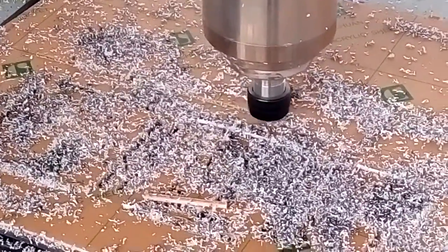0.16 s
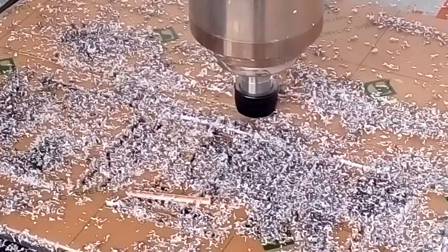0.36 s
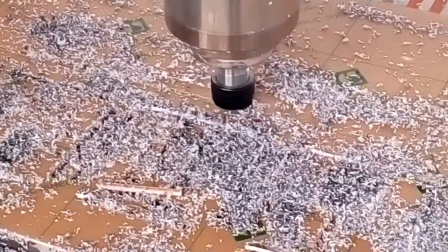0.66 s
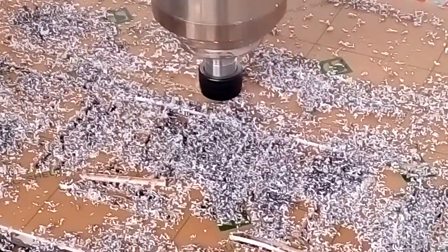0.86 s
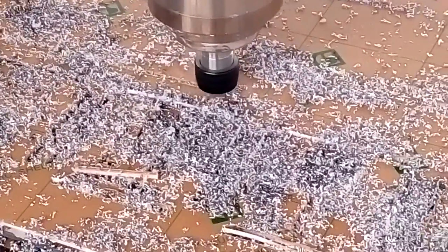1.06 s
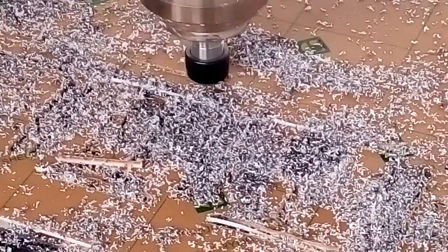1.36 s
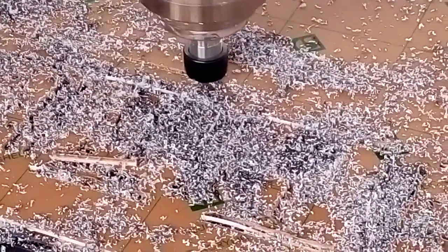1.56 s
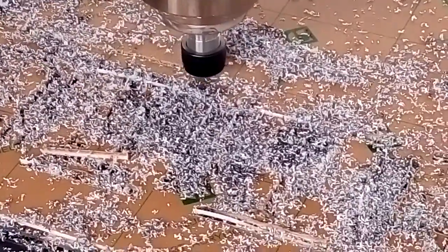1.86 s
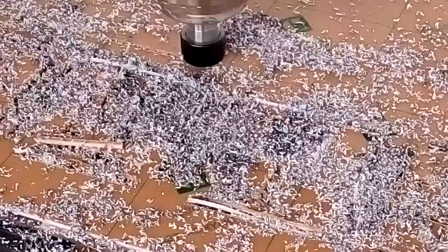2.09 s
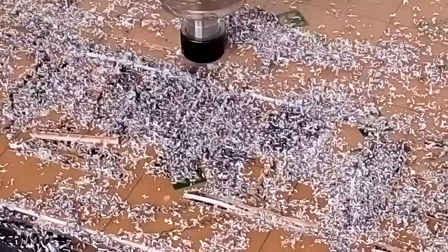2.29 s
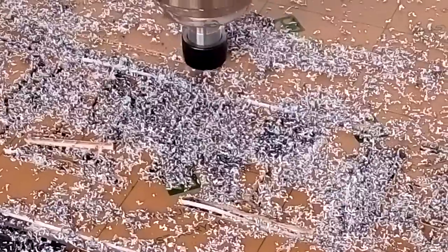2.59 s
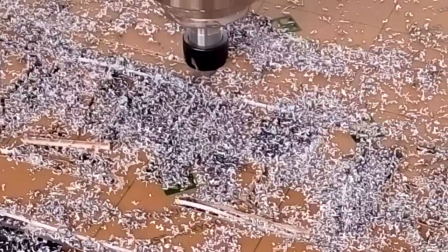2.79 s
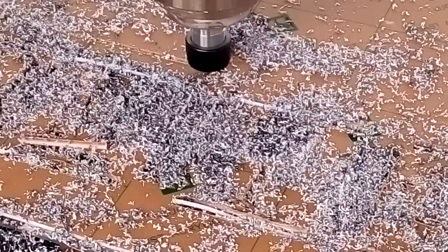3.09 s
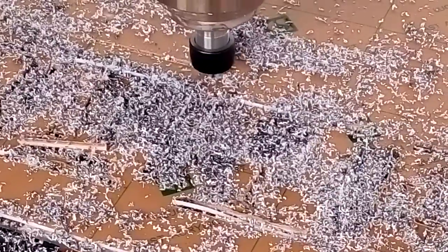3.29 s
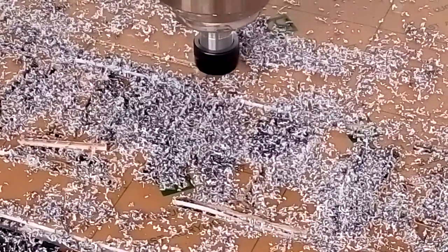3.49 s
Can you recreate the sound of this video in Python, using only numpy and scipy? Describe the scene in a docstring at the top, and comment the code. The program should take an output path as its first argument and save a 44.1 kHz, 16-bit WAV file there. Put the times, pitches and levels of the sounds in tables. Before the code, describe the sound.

A router spindle cutting chip-covered sheet holds a loud, steady electric whine with fainter higher tones above soft hiss. Late on, a breathy puff of air swells and dies. Close stereo microphone in a workshop, whine heavier on the left.

```python
"""A workshop, a pair of microphone ports close to a router spindle cutting sheet stock at about 24000 rpm.
The gantry creeps away. Every multiple of the turning rate whines, a clean line low down and narrow noise
higher up. The motor drive adds thin tones, chips and cooling air are shaped noise chopped once a turn,
and one longer puff of noise through resonances swells and dies over a low drone. Brief glitches in the
left channel flip the polarity of one clean line and add faint treble fizz."""
import sys
import numpy as np
from scipy import signal
from scipy.fft import rfft, irfft
from scipy.io import wavfile

SR = 44100
rng = np.random.default_rng(int(sys.argv[2]) if len(sys.argv) > 2 else 0)


def dump(signal):
    """Clip the signal to [-1, 1] and save it as 16-bit WAV at the path in sys.argv[1]."""
    limited = np.clip(np.atleast_2d(signal).T, -1, 1)
    pcm = np.round(limited * 32767).astype(np.int16)
    wavfile.write(sys.argv[1], SR, pcm)


def invert_db(x):
    """Field ratio 10**(x/20) for x, a level in decibels (scalar or array-like)."""
    u = np.asarray(x, float) / 20
    return 10 ** u


N = 160965
T = np.arange(N) / SR  # s
TURN_HZ = 399.26
BEAT_HZ, BEAT_TOP_S = 0.77, 0.87  # slow swell shared by the eight-turn tones below one turn and the rumble

# Workshop drone: pitch_hz, width_hz, left_db, right_db
DRONE_HUMS = [(49, 5, -61, -69), (101.3, 6.4, -61.5, -62), (138.5, 7.1, -55, -65), (167.6, 8.7, -56.5, -56)]
# Relative spectrum of the chip and air hiss: pitch_hz, level_db (per Hz)
HISS_SPECTRUM = [(25, -12.5), (60, -14), (110, -3), (250, -0.5), (500, -2), (800, -0.5), (1200, -1),
                 (1800, -3.5), (2300, 4), (2800, -7.5), (4900, -9), (5700, -5.5), (6500, -3), (7200, -11.5),
                 (8000, -24), (9500, -30), (12000, -38.5), (15000, -53.5)]
# Hiss, left port over right port: pitch_hz, balance_db
HISS_LEFT_OVER_RIGHT = [(60, 3), (200, 5.5), (500, 2.5), (1500, 17), (2500, -8), (4200, -2), (7200, -9),
                        (9000, -11.5), (12000, 1.5)]
# Likeness of the hiss at the two ports: pitch_hz, correlation (0 to 1)
HISS_CORRELATION = [(60, .6), (150, 0.93), (500, 0.78), (1500, 0.69), (4000, 0.18)]
# Hiss change from start to end: pitch_hz, left_db, right_db
HISS_TRAVEL = [(300, 0, 1), (1490, -1.4, -2.5), (3500, -2.3, -11.5), (7000, -2, -2.5)]
# Thin motor drive tones, before their 3 dB mid-travel lift: turns_above_drive (turning rates), left_db, right_db
DRIVE_TONES = [(0, -57, -46.5), (2, -53.5, -66)]
# Pattern repeating every eight turns: eighths (of the turning rate), left_db, right_db
EIGHT_TURN_TONES = [(6, -60.5, -56), (7, -50, -60), (15, -50, -65), (18, -54.5, -58), (22, -62.5, -57),
                    (23, -48.5, -52)]
# Course of the puff: start_s, whistling_top_db, low_rush_db, tilt_db (top above the split over top below)
PUFF_COURSE = [(2.3, -44, -41, -8), (2.45, -42, -36, -5), (2.578, -32.5, -35.5, 3), (2.65, -24.5, -33, 4.5),
               (2.8, -22, -37, -2), (2.89, -25.5, -35, -5.5), (3.0, -28.5, -36, -10),
               (3.09, -36.5, -42, -11), (3.27, -44, -52, -12)]
# Resonances of the whistling top: pitch_hz, width_hz, level_db (relative), balance_db (left over right)
PUFF_WHISTLES = [(3478, 180, -2.5, 9.5), (3807, 260, 4, 3), (4240, 440, 0, -5.5), (4930, 260, -2, -12),
                 (5550, 360, -3.5, -10), (5906, 210, 0, -5), (8650, 1200, -22, 2), (10600, 700, -36, 0),
                 (4490, 4100, 3.5, -3)]
# Resonances of the low rush: pitch_hz, width_hz, level_db (relative), balance_db (left over right)
PUFF_RUSH = [(1000, 810, -5.5, 11.5), (1660, 490, -8, 7.5), (2685, 800, -3, -8.5)]
# Glitches: brief polarity flips of the left 6th multiple with treble fizz: start_s, length_s, fizz_db
GLITCH_TIMES = [(0.705, 0.04, -50), (1.966, 0.04, -50)]
# Clean multiples: multiple (of the turning rate), left_early_db, left_late_db, right_early_db,
# right_late_db, left_lead_rad, smear_left_db, smear_right_db
CLEAN_MULTIPLES = [(1,-36,-39.5,-35.5,-36.5,0.39,-53,-54.5), (3,-34.5,-33,-28.5,-33,.5,-45,-47.5),
                   (4,-31,-30.5,-36.5,-38.5,2.5,-41,-39.5), (5,-54,-44.5,-39.5,-59.5,1.5,-44,-50),
                   (7,-64.5,-58,-54,-57,1.5,-54,-50.5), (8,-56.5,-52.5,-51.5,-53.5,2,-51,-52.5),
                   (9,-48,-45,-43.5,-45,4,-52,-45.5), (10,-59,-44.5,-44.5,-50,4.5,-44,-43.5),
                   (13,-60,-60.5,-54.5,-53.5,2.5,-55,-52), (14,-57,-60,-55.5,-66.5,0.5,-46.5,-45.5),
                   (15,-54,-51.5,-53.5,-45.5,-3.5,-55.5,-43), (16,-57,-60.5,-53,-64.5,3,-53.5,-46.5)]
# The two loudest multiples along the travel: start_s, second_left_db, second_right_db,
# sixth_left_db, sixth_right_db, sixth_left_lead_rad
LOUDEST_COURSE = [(0, -13.5, -30.5, -27, -27, 2.08), (.6, -15, -40.5, -25, -26, 2.02),
                  (1.05, -17, -28.5, -25, -26, 2.4), (1.5, -16.5, -30, -26.5, -25, 2.5),
                  (1.85, -13, -24.5, -28.5, -31.5, 2.3), (2.35, -12, -25.5, -28.5, -33.5, 1.72),
                  (2.9, -12, -25, -31, -31, 0.82), (3.3, -12, -24.5, -28.5, -24.5, 1.3),
                  (3.65, -11.5, -21.5, -27.5, -23, 1.2)]
# Smeared part of those two: multiple (of the turning rate), left_db, right_db
LOUDEST_SMEAR = [(2, -36.5, -46), (6, -42.5, -38)]
# Multiples with no clean line left: multiple (of the turning rate), left_db, right_db
SMEARED_MULTIPLES = [(11,-57.5,-58), (12,-61.5,-57.5), (17,-65.5,-46), (18,-75,-50), (19,-70.5,-56.5),
                     (20,-73.5,-60), (28,-78.5,-74)]
# Upper multiples as the head travels: multiple (of the turning rate), middle_swell_db, start_to_end_db
UPPER_CHANGES = [(13, -5, 0), (14, 3, -3), (15, 7, -2), (16, 0, -6), (17, 1, -7)]


def unit(x):
    """Scale to rms 1."""
    return x / np.sqrt(np.mean(np.abs(x) ** 2))


def wobble(hz):
    """Complex low-passed noise of rms 1 (either part alone about 0.7), about hz wide on each side."""
    n = N // 64 + 2  # drawn at every 64th sample
    f = np.fft.fftfreq(n, 64 / SR)
    white = rng.standard_normal(n) + 1j * rng.standard_normal(n)
    slow = unit(np.fft.ifft(white / (1 + (f / hz) ** 2)))
    at = np.arange(N) / 64
    return np.interp(at, np.arange(n), slow.real) + 1j * np.interp(at, np.arange(n), slow.imag)


def wobble_pair(hz):
    """Independent slow noise for the left and right ports."""
    return np.array([wobble(hz) for _ in range(2)])


def tone(hz, envelope):
    """A carrier under a complex envelope; rms 1 for an envelope of size 1."""
    return np.sqrt(2) * (envelope * np.exp(2j * np.pi * (hz * T + rng.random()))).real


def on_log_axis(rows, hz):
    """Read (Hz, value) points on a log frequency axis."""
    rows = np.array(rows, float)
    return np.interp(np.log(hz + 1), np.log(rows[:, 0]), rows[:, 1])


def slow_beat():
    """The slow swell, from -1 to 1."""
    return np.cos(2 * np.pi * BEAT_HZ * (T - BEAT_TOP_S))


def workshop_drone():
    """Narrow noise around each hum, mostly alike at the two ports."""
    out = 0
    for hz, width, left, right in DRONE_HUMS:
        envelope = wobble(width / 2) + 0.33 * wobble_pair(width / 2)
        out = out + tone(hz, invert_db([[left], [right]]) * envelope)
    return out


def chip_and_air_hiss():
    """Shaped noise chopped once a turn; each octave drifts and flickers a little on its own."""
    level_db, chop_depth = -36.5, 0.1
    flicker_db, flicker_hz, rumble_beat_db = 1.0, 4.8, 3.5
    hz = np.fft.rfftfreq(N, 1 / SR)
    alike = np.clip(on_log_axis(HISS_CORRELATION, hz), 0, 0.99)
    chop = 1 + chop_depth * np.cos(2 * np.pi * TURN_HZ * T)
    mid, side = (rfft(chop * rng.standard_normal(N)) for _ in range(2))
    sign = np.array([[1], [-1]])  # left, right
    pair = np.sqrt(1 + alike) * mid + sign * np.sqrt(1 - alike) * side
    balance_db = sign * on_log_axis(HISS_LEFT_OVER_RIGHT, hz) / 2
    spectrum = pair * invert_db(on_log_axis(HISS_SPECTRUM, hz) + balance_db)
    out, travel = 0, np.array(HISS_TRAVEL, float)
    for octave in range(5, 15):  # centred on 2 ** octave Hz
        part = np.cos(np.pi / 2 * np.clip(np.log2(hz + 1) - octave, -1, 1)) ** 2
        change = [[np.interp(octave, np.log2(travel[:, 0]), travel[:, c])] for c in (1, 2)]
        gain_db = np.array(change) * (T / T[-1] - 0.5) + flicker_db * wobble(flicker_hz).real
        if octave < 9:  # the rumble below about 400 Hz swells
            gain_db = gain_db + rumble_beat_db * slow_beat()
        out = out + irfft(spectrum * part, N) * invert_db(gain_db)
    return unit(out) * invert_db(level_db)


def motor_drive():
    """Thin wavering tones that stand out over the middle of the travel, the right port a quarter cycle behind."""
    drive_hz, rise_db, rise_s, fall_s = 4986, 6, 1.0, 2.45
    window = (np.tanh((T - rise_s) / 0.21) - np.tanh((T - fall_s) / 0.1) - 1) / 2
    out = 0
    for turns, left, right in DRIVE_TONES:
        envelope = invert_db([[left], [right]] + rise_db * window) * (1 + 0.19 * wobble(3.3))
        out = out + tone(drive_hz + turns * TURN_HZ, envelope * [[1], [-1j]])
    return out


def eight_turn_pattern():
    """Tones at eighths of the turning rate; those below one turn swell and fade, the tone at 18 eighths swells late."""
    beat_depth = 0.53
    late_db, late_s, late_span_s = 10, 2.7, 0.3
    out = 0
    for k, left, right in EIGHT_TURN_TONES:
        beat = 1 + (k < 8) * beat_depth * slow_beat()
        late = invert_db((k == 18) * late_db * np.exp(-((T - late_s) / late_span_s) ** 2))
        envelope = invert_db([[left], [right]]) * beat * late * (1 + 0.19 * wobble(3.9))
        out = out + tone(k * TURN_HZ / 8, envelope)
    return out


def puff():
    """Air noise through resonances that flicker alone; the top darkens as it dies, the low rush has its own swell."""
    split_hz, edge_hz = 3600, 7500  # resonances placed below the edge stop there
    grain_db, grain_hz = 2.5, 14.0
    hz, rows, out = np.fft.rfftfreq(N, 1 / SR), np.array(PUFF_COURSE, float), 0
    fade = np.clip(np.minimum(T - rows[0, 0], rows[-1, 0] - T) / 0.091, 0, 1)
    upper = 1 / (1 + (split_hz / (hz + 1)) ** 12)
    edge = 1 / (1 + (hz / edge_hz) ** 14)
    tilt = invert_db(np.interp(T, rows[:, 0], rows[:, 3]) / 2)
    for column, peaks in ((1, PUFF_WHISTLES), (2, PUFF_RUSH)):
        above, below = 0, 0
        for f, width, db, balance in peaks:
            power = 1 / width / (1 + (2 * (hz - f) / width) ** 2) ** 3
            if f < edge_hz:
                power = power * edge
            noise = 0.22 * rng.standard_normal(N) + rng.standard_normal((2, N))  # a little in common
            spectrum = rfft(noise) * np.sqrt(power)
            pair_db = [[db + balance / 2], [db - balance / 2]]
            gain = invert_db(pair_db + grain_db * wobble(grain_hz).real)
            above = above + gain * irfft(spectrum * upper, N)
            below = below + gain * irfft(spectrum * (1 - upper), N)
        rms = np.sqrt(np.mean((above + below) ** 2))
        air = above * tilt + below / tilt if column == 1 else above + below
        out = out + air / rms * invert_db(np.interp(T, rows[:, 0], rows[:, column])) * fade
    return out


def left_channel_glitches():
    """A gate that is 1 during each glitch, and the faint treble noise added to the left channel."""
    gate, fizz = 0, 0
    hz = np.fft.rfftfreq(N, 1 / SR)
    band = 1 / (1 + (8000 / (hz + 1)) ** 12) / (1 + (hz / 9500) ** 6)
    noise = unit(irfft(rfft(rng.standard_normal(N)) * band, N))
    for start, length, db in GLITCH_TIMES:
        gate = gate + np.clip(np.minimum(T - start, start + length - T) / 0.0059 + 0.5, 0, 1)
        swell = np.sin(np.pi * np.clip((T - start) / length, 0, 1)) ** 0.5
        fizz = fizz + swell * invert_db(db) * noise
    return gate, fizz * [[1], [0]]


def smear(k):
    """Two partly alike noise envelopes, wider for higher multiples, swelling in slow patches."""
    width_hz, alike = 8.4 + 1.77 * k, 0.3  # alike: share of power in common
    patch_db, patch_hz = 3, 3.2
    both = wobble(width_hz)
    patch = invert_db(patch_db * wobble(patch_hz).real)
    return patch * (np.sqrt(alike) * both + np.sqrt(1 - alike) * wobble_pair(width_hz))


def upper_travel(k):
    """Gain of one multiple as the head travels; 1 outside the table."""
    middle_s, span_s = 2.2, 0.84
    rows = np.array(UPPER_CHANGES, float)
    middle, change = (np.interp(k, rows[:, 0], rows[:, c], 0, 0) for c in (1, 2))
    swell = np.exp(-((T - middle_s) / span_s) ** 2) - 0.5
    return invert_db(middle * swell + change * (T / T[-1] - 0.5))


def whine(k, db, waver_share, lead, smear_db, glitch_gate):
    """One multiple: a slowly wavering clean line with a smeared skirt, the left port leading in phase."""
    waver = 1 + waver_share * wobble_pair(1.9)
    if k == 6:
        waver[0] = waver[0] * (1 - 2 * glitch_gate)  # a glitch flips the left polarity
    envelope = invert_db(db) * waver + invert_db(smear_db) * smear(k)
    left_lead = np.exp(1j * lead * np.array([[1], [0]]))
    return tone(k * TURN_HZ, envelope * upper_travel(k) * left_lead)


def spindle(glitch_gate):
    """Multiples of the turning rate: clean lines that drift with the travel, and smeared ones higher up."""
    travel = np.clip(T / T[-1] * 1.91 - 0.3, -0.3, 1.3)  # 0 early, 1 late, a little beyond both
    out = 0
    for k, l0, l1, r0, r1, lead, smear_l, smear_r in CLEAN_MULTIPLES:
        db = [l0 + (l1 - l0) * travel, r0 + (r1 - r0) * travel]
        out = out + whine(k, db, 0.048 * k, lead, [[smear_l], [smear_r]], glitch_gate)

    course = np.array(LOUDEST_COURSE, float)
    second_lead = -1.5 + (-1.15 + 1.5) * travel  # rad
    sixth_lead = np.interp(T, course[:, 0], course[:, 5])
    leads = second_lead, sixth_lead
    for i, (k, smear_l, smear_r) in enumerate(LOUDEST_SMEAR):
        db = [np.interp(T, course[:, 0], course[:, 1 + 2 * i + c]) for c in range(2)]
        out = out + whine(k, db, 0.067, leads[i], [[smear_l], [smear_r]], glitch_gate)

    # multiples 21 to 38 fall by 1.4 dB each
    faint = [(k, -67.5 - 1.4 * (k - 21), -67.5 - 1.4 * (k - 21)) for k in range(21, 39)]
    for k, left, right in [*SMEARED_MULTIPLES, *faint]:
        out = out + tone(k * TURN_HZ, invert_db([[left], [right]]) * smear(k) * upper_travel(k))
    return out


def scene():
    """All sources at the two microphone ports, with the left channel's glitches."""
    glitch_gate, fizz = left_channel_glitches()
    background = workshop_drone() + chip_and_air_hiss()
    machine = motor_drive() + eight_turn_pattern() + puff()
    return background + machine + fizz + spindle(glitch_gate)


def low_pass(x):
    """Removes everything above the highest recorded frequency."""
    return signal.sosfilt(signal.butter(12, 15480, fs=SR, output="sos"), x)


def record(dry):
    """The finished mix of the two ports, as it is kept."""
    return low_pass(dry)


dry = scene()
out = record(dry)
dump(out)
```